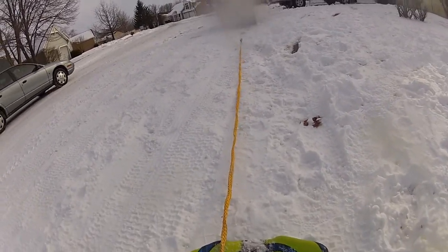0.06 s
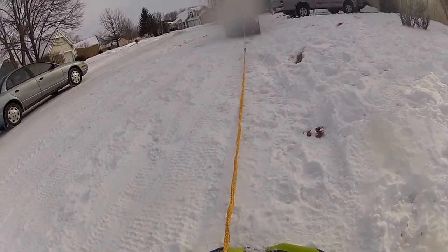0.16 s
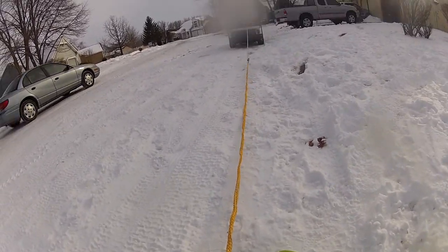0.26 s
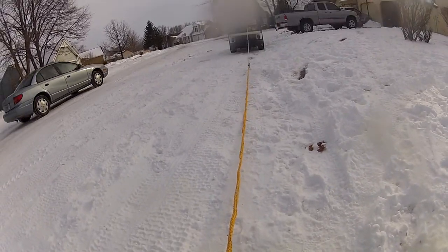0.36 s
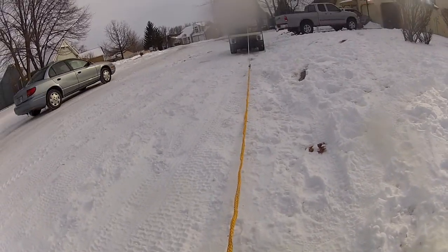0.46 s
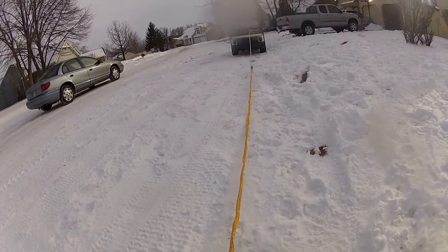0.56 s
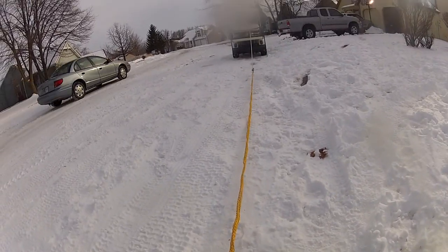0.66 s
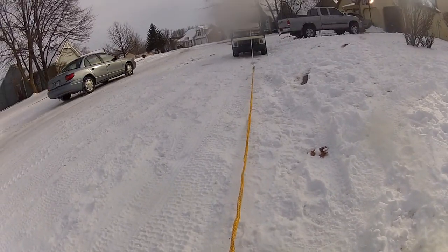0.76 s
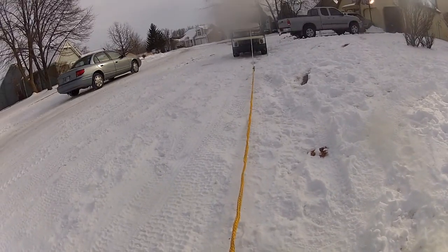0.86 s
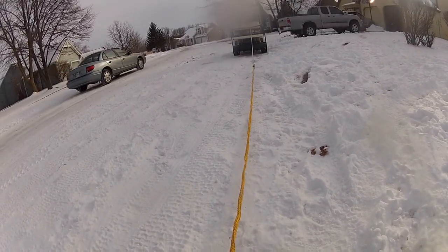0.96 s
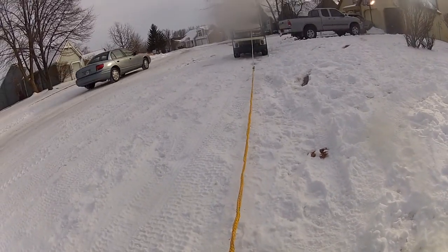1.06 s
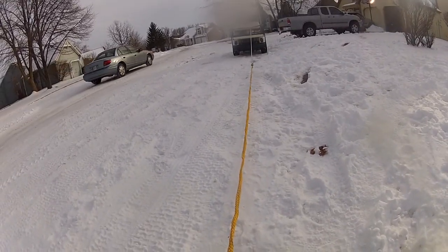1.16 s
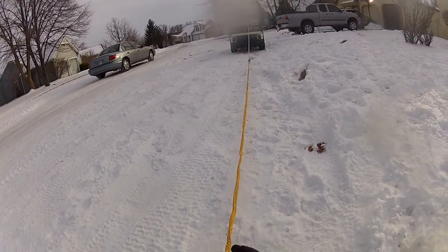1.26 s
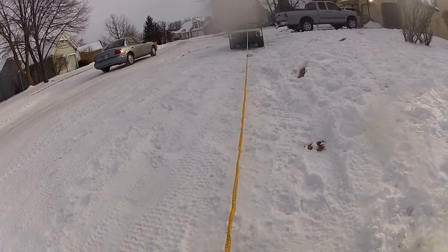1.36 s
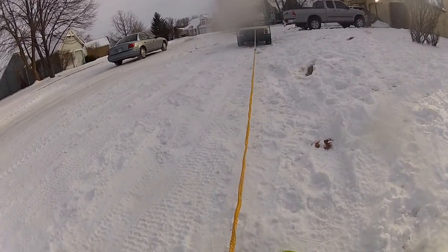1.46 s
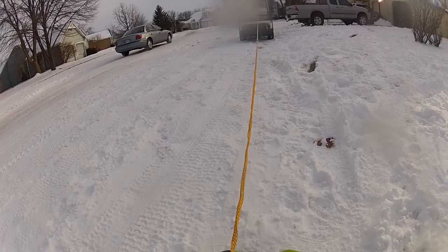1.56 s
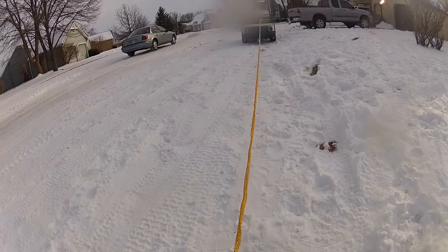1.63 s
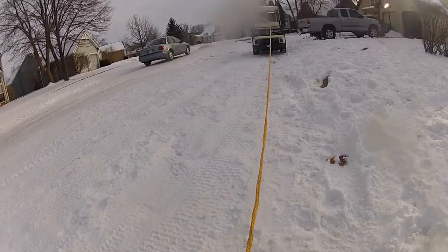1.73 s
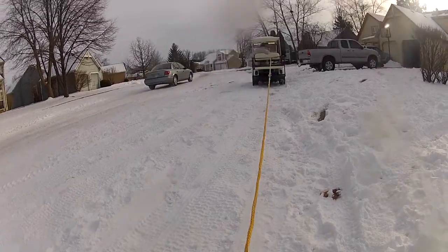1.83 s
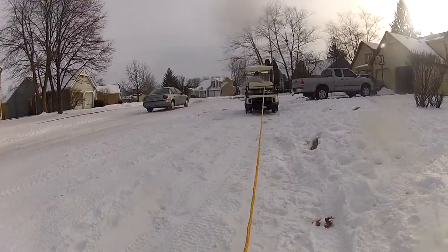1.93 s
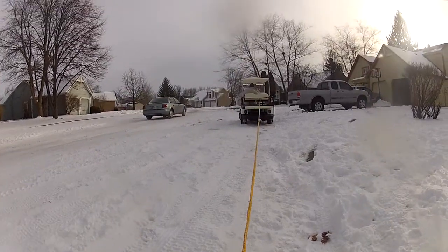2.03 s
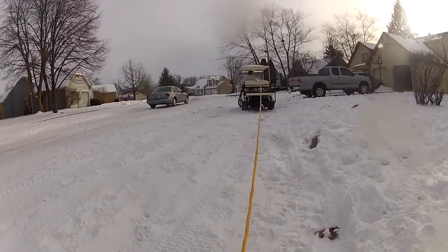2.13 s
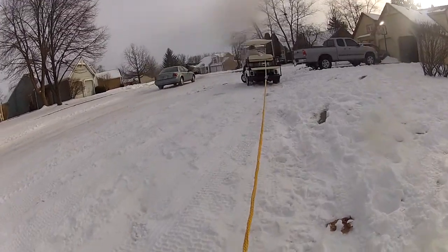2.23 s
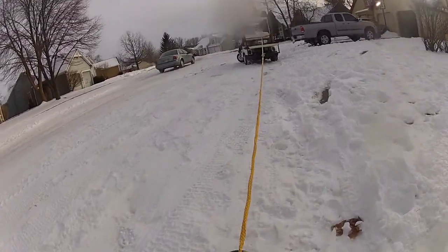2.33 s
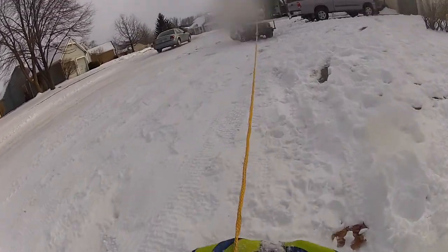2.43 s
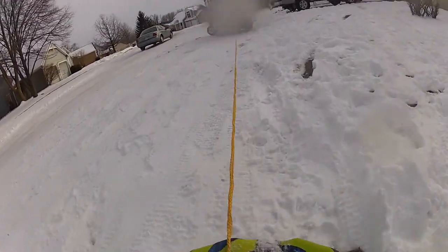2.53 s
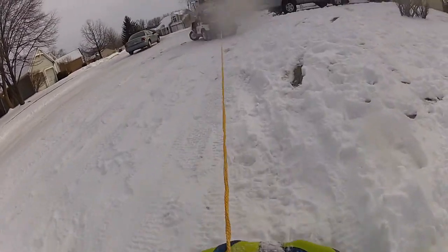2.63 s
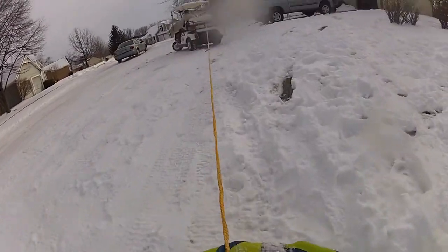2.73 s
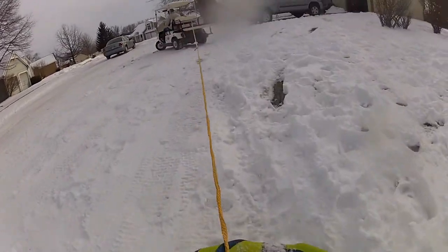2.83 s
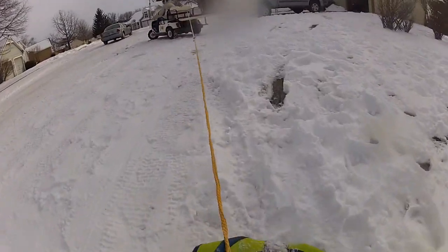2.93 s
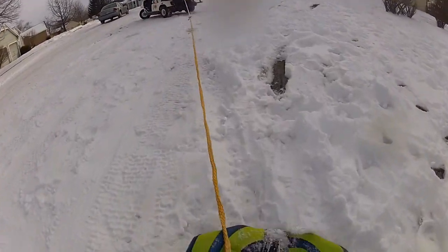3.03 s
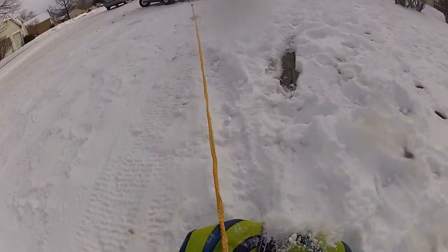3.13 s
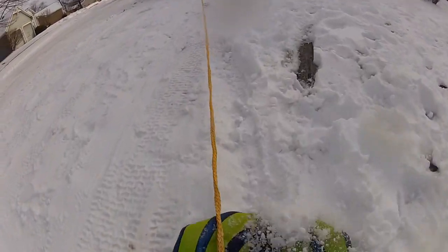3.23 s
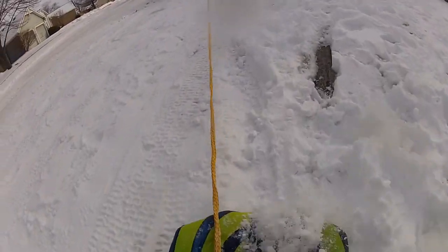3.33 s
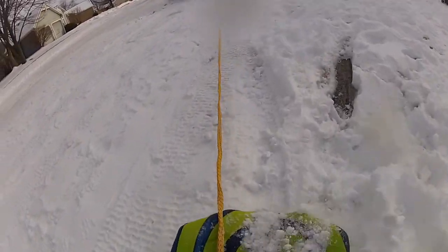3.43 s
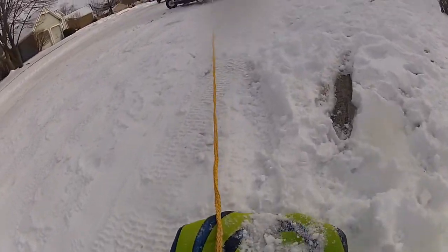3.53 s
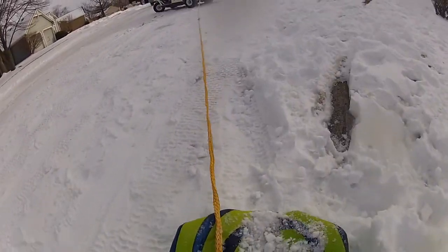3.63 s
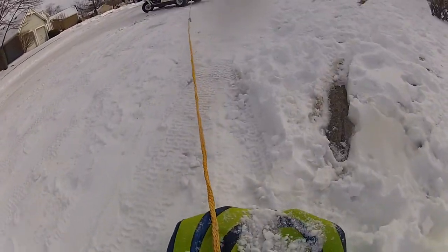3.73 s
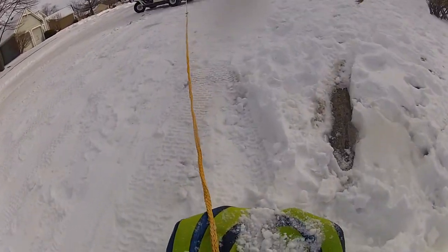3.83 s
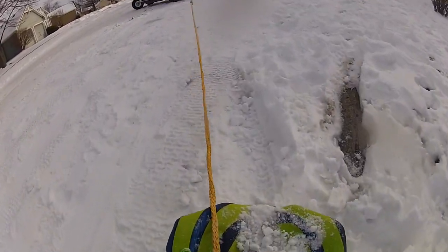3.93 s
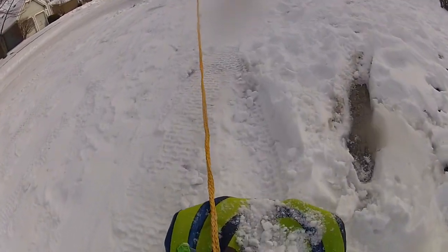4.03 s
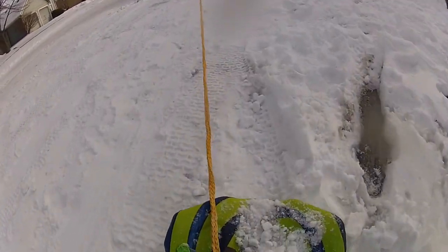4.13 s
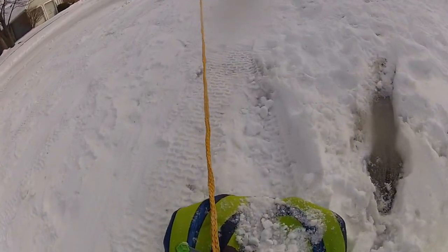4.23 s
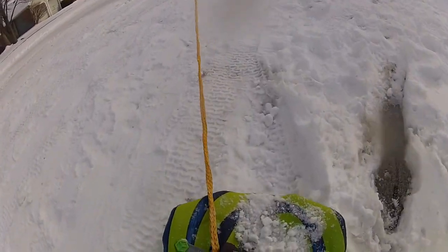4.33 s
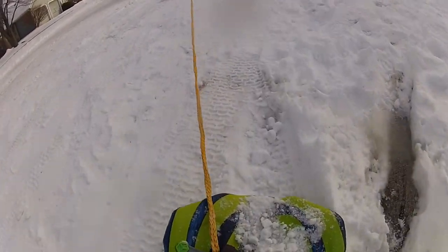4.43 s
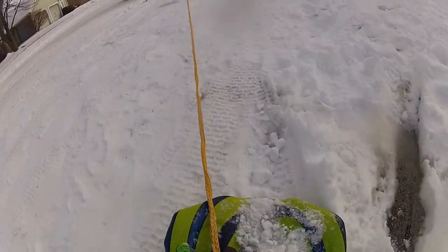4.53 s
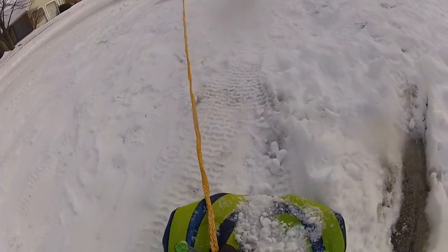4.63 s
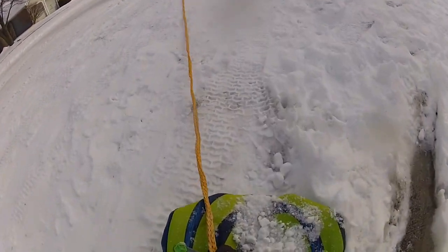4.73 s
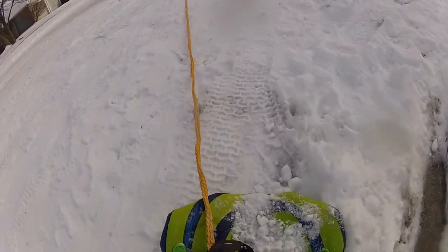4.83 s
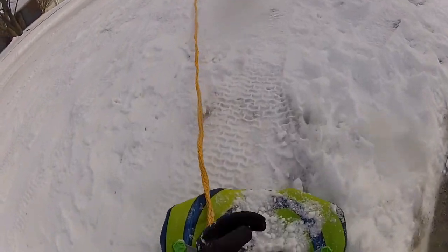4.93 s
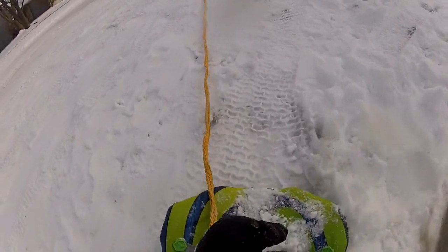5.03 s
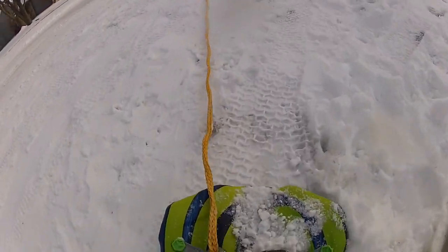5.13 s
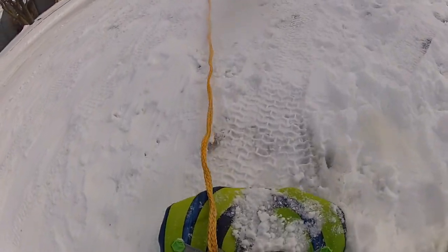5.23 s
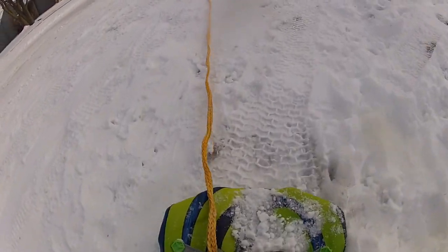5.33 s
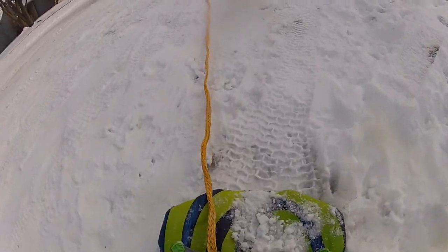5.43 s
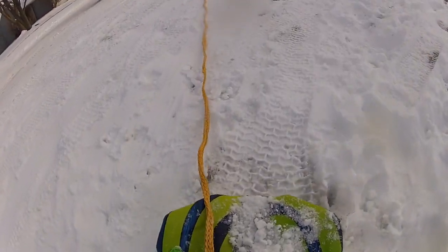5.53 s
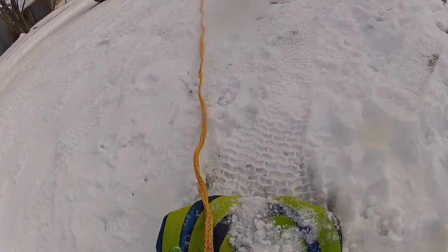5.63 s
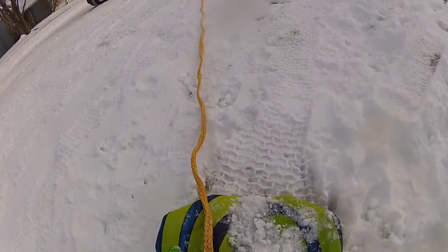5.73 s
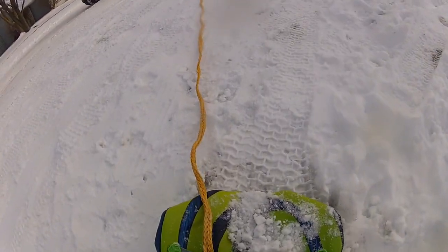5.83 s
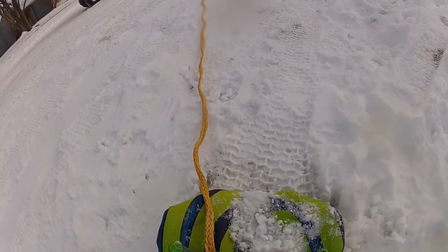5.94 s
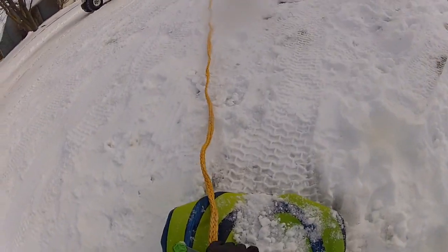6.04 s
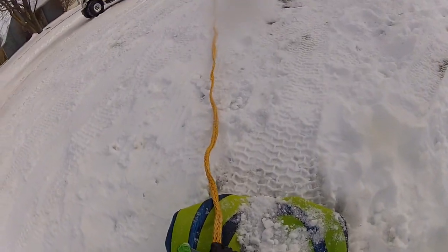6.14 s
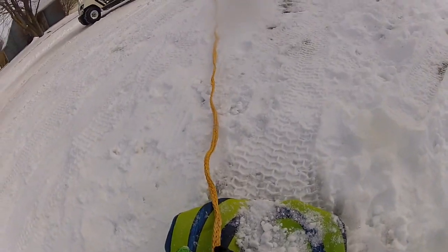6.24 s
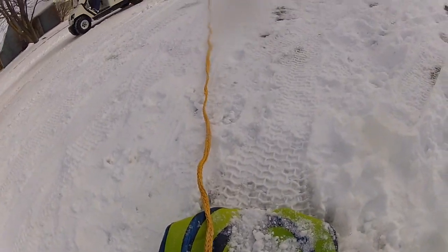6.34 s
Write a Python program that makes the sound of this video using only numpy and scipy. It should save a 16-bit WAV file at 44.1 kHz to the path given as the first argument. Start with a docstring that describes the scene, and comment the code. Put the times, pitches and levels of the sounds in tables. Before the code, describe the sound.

Plastic clicks close by over a quiet puttering engine, then a towed sled crunches, thumps and hisses roughly over packed snow before stopping.

```python
"""Snow crunches, hisses and thumps under a towed sled, plastic clicks close by and an engine putters ahead.
The hollow hull turns dense random fractures into crunch, boom and hiss; hard lumps make it swing once.
The microphone rides along in a plastic case, whose slipping joints strike ringing modes and a dull knock.
A small cart tows the sled: its exhaust puffs once per firing at the far end of the rope.
Crust ticks, snow patters briefly on the case, and the open air adds a faint steady hiss."""
import sys
import numpy as np
from scipy.fft import rfft, irfft, next_fast_len
from scipy.io import wavfile
from scipy.ndimage import map_coordinates

SR = 44100
rng = np.random.default_rng(int(sys.argv[2]) if len(sys.argv) > 2 else 0)


def inscribe(sig):
    """Save sig as 16-bit PCM at rate SR to the path in sys.argv[1].

    A 1-D sig is mono; a 2-D sig holds one channel per row.
    Samples are clipped to [-1, 1] before scaling.
    """
    pcm = np.round(np.clip(np.atleast_2d(sig).T, -1, 1) * 32767)
    wavfile.write(sys.argv[1], SR, pcm.astype(np.int16))


N = 281799

# hull on the snow, pulled away, ploughing through deep snow, gliding, stopping:
# (t/s, crunch level/dB, hiss level/dB)
HULL_SLIDE = [(0, -40.5, -56.5), (.8, -42.5, -71.5), (1.35, -43, -66), (1.62, -39.5, -57),
              (1.77, -29, -48.5), (1.83, -23.5, -40), (2.1, -23, -37.5), (2.42, -21.5, -38),
              (2.56, -23.5, -41.5), (3.02, -20.5, -46.5), (3.04, -20.5, -39.5), (3.22, -15, -34.5),
              (3.36, -18, -34.5), (3.52, -25, -40.5), (3.95, -27, -43.5), (4.3, -24.5, -42),
              (4.72, -25.5, -43.5), (5.0, -23, -37.5), (5.09, -27, -41.5), (5.36, -24.5, -39),
              (5.49, -21, -34), (5.61, -31, -45), (5.76, -30, -46), (5.82, -29, -50), (5.85, -41.5, -62),
              (6.12, -41.5, -63.5), (6.39, -40, -58.5)]
# lumps that hit the hull hard: (t/s, level/dB, f/Hz)
HARD_LUMPS = [(1.533, -21.5, 380), (1.707, -19, 398), (1.809, -10.5, 392), (1.923, -10, 366),
              (2.161, -8.5, 375), (2.279, -7.5, 327), (2.3282, 0.5, 313), (2.3647, -6.5, 320),
              (2.541, -18.5, 337), (2.627, -11, 424), (2.6665, -5.5, 365), (2.711, -5, 393),
              (2.7402, -8, 343), (2.781, 5, 300), (2.9262, -7, 360), (2.9473, -10.5, 359),
              (3.021, -16.5, 437), (3.0898, -5.5, 398), (3.1288, 3, 330), (3.194, -1.5, 270),
              (3.229, -9, 327), (3.2658, -2.5, 359), (3.2871, -6, 400), (3.41, -12, 298),
              (3.6248, -1.5, 376), (3.665, -10, 348), (3.7796, -11.5, 265), (3.8163, -7.5, 274),
              (3.869, -12.5, 283), (3.919, -10.5, 330), (4.042, -9.5, 317), (4.144, -10, 383),
              (4.181, 4, 364), (4.203, -8.5, 367), (4.2457, -8.5, 375), (4.3176, -5, 405),
              (4.334, -10, 370), (4.386, -6, 358), (4.4348, -1, 437), (4.5439, 0.5, 312),
              (4.6771, -10.5, 483), (4.71, -15, 221), (4.7689, -4.5, 337), (4.8661, 4.5, 382),
              (4.9232, -8, 404), (4.992, -9.5, 370), (5.0217, -10, 420), (5.1709, -4.5, 420),
              (5.218, -12, 402), (5.5046, -5.5, 424), (5.8162, -15.5, 295), (6.2178, -19.5, 423)]


def amp(db):
    """Decibels to gain."""
    return 10 ** (np.asarray(db) / 20)


def unit(x):
    """x at rms 1."""
    return x / np.sqrt(np.mean(x ** 2) + 1e-20)


def curves(rows):
    """One value per sample for each column after the time."""
    s, *cols = np.transpose(rows)
    return [np.interp(np.arange(N) / SR, s, c) for c in cols]


def wobble(rate):
    """A smooth random curve, rate knots a second."""
    knots = rng.standard_normal(int(N * rate / SR) + 4)
    return map_coordinates(knots, [np.arange(N) * rate / SR])


def swell(s, length):
    """A smooth bump of height 1 around time s; length is its width in s at 1/e of the height."""
    return np.exp(-(2 * (np.arange(N) / SR - s) / length) ** 2)


def colour(x, points):
    """x through a causal, minimum-phase filter with the given (f/Hz, level/dB) spectrum."""
    m = next_fast_len(len(x) + 8192)
    hz, db = np.transpose(points)
    log_hz = np.log(np.fft.rfftfreq(m, 1 / SR) + 1)
    cepstrum = irfft(np.log(amp(np.interp(log_hz, np.log(hz), db))), m)
    # folding the cepstrum forward in time makes the filter causal
    cepstrum[1:m // 2] *= 2
    cepstrum[m // 2 + 1:] = 0
    return irfft(rfft(x, m) * np.exp(rfft(cepstrum)), m)[:len(x)]


def below(x, hz):
    """Steep low-pass."""
    m = next_fast_len(N + 8192)
    return irfft(rfft(x, m) * (np.fft.rfftfreq(m, 1 / SR) < hz), m)[:N]


def add(track, s, sound):
    """Mix a sound into the track from time s."""
    part = track[max(round(s * SR), 0):][:len(sound)]
    part += sound[:len(part)]


def grains(rate, spread_db, smooth):
    """Random fractures of uneven size, rate a second, over a share of smooth rubbing noise."""
    sizes = amp(spread_db * np.clip(rng.standard_normal(N), -2, 2)) * rng.choice([-1, 1], N)
    fractures = sizes * (rng.random(N) < rate / SR)
    return unit(unit(fractures) + smooth * rng.standard_normal(N))


def sliding():
    """Crust collapses under the hull, which booms; crystals scrape along it and hiss."""
    # kind of snow: (t/s, icy grit level re the hiss/dB, firmness as upper crunch over lower/dB)
    snow = [(1.5, -14, -3), (1.9, -4.5, 0.5), (2.25, -6.5, 1), (2.6, -15, 0), (3.02, -11.5, -2),
            (3.05, -6, -1.5), (3.35, -3.5, -2.5), (3.65, -13.5, -2.5), (4.05, -9, 3), (4.35, -38.5, 0.5),
            (4.65, -11, -2), (5.03, -7, -1), (5.3, -12, 4), (5.7, -11.5, 0.5)]
    # spectrum of collapsing crust in the hull: (f/Hz, level/dB)
    crunch_spectrum = [(25, -26), (50, -25.5), (80, -11), (130, -5.5), (200, 0.5), (310, 3), (400, 0),
                       (520, -0.5), (650, -3), (800, -12.5), (1050, -24.5), (1600, -31), (3000, -74)]
    # spectrum of scraping crystals: (f/Hz, level/dB)
    hiss_spectrum = [(500, -11.5), (1000, 1.5), (1500, -2.5), (2100, 2), (2800, 3.5), (3650, 0),
                     (4300, -16.5), (5100, -9), (6000, -33.5), (7000, -20.5), (10000, -38)]
    # spectrum of fine powder: (f/Hz, level/dB)
    powder_spectrum = [(4000, -6), (6100, -17), (6900, 1.5), (7700, -12), (8500, 4.5), (9400, 3),
                       (10600, -12), (13300, -12), (14200, -9), (15100, 3), (15600, -27)]
    # spectrum of icy grit: (f/Hz, level/dB)
    grit_spectrum = [(2500, -10.5), (3800, 5.5), (4900, 0.5), (5500, -3), (6100, -17), (7200, -1.5),
                     (8000, -0.5), (11000, -18)]
    split_hz = 450  # between boom and rasp
    powder_re_hiss_db, powder_growth = -9.5, 1.3  # growth: dB per dB of hiss

    crunch_db, hiss_db = curves(HULL_SLIDE)
    ice_db, firm_db = curves(snow)
    contact_db = contact()
    crunch_db, hiss_db = crunch_db + 0.81 * contact_db, hiss_db + contact_db
    pressure = wobble(28)  # the load shifts over the uneven track

    crunch = unit(colour(grains(rate=300, spread_db=2.5, smooth=0.81), crunch_spectrum))
    boom = below(crunch, split_hz)
    rasp = crunch - boom
    crunch = boom * amp(-firm_db / 2) + rasp * amp(firm_db / 2)  # soft snow booms, firm snow rasps

    scrape = 0.84 * wobble(170) + 1.4 * wobble(45)  # dB: crystals catch in small clumps
    hiss = unit(colour(grains(rate=1100, spread_db=1.5, smooth=1.0), hiss_spectrum))
    powder = unit(colour(grains(rate=5000, spread_db=8, smooth=1.5), powder_spectrum))
    grit = unit(colour(grains(rate=1500, spread_db=5.5, smooth=0.95), grit_spectrum))
    # above a floor, powder grows a little faster than the hiss
    extra_db = np.maximum((powder_growth - 1) * (hiss_db + 33.5), -1)
    powder_db = hiss_db + powder_re_hiss_db + extra_db
    return (crunch * amp(crunch_db - 2.5 + 2.16 * pressure)
            + hiss * amp(hiss_db - 1.84 + .5 * pressure + scrape + 0.62 * wobble(14))
            + powder * amp(powder_db + 0.49 * pressure + scrape)
            + grit * amp(hiss_db + ice_db + scrape))


def contact():
    """Change of pressure in dB: ridges press on the hull, a hard blow unloads it for a moment."""
    # ridges of snow that the hull scrapes over: (t/s, length/s, swell/dB)
    ridges = [(2.672, 0.039, 3.5), (2.925, 0.043, 6.5), (3.742, 0.067, 2.5), (4.837, 0.04, 4.5),
              (5.227, 0.058, 4)]
    # the hardest blows lift the hull off the snow, the harder the longer
    hop_above_db, hop_s, hop_s_per_db, hop_dip_db = 3.5, 0.011, 0.09, 7

    press_db = sum(db * swell(s, length) for s, length, db in ridges)
    flights = [(s, hop_s + hop_s_per_db * (db - hop_above_db))
               for s, db, hz in HARD_LUMPS if db > hop_above_db]
    return press_db - hop_dip_db * sum(swell(s + 0.36 * length, length) for s, length in flights)


def lumps():
    """A lump pushes the hull up and lets it go: one heavily damped swing."""
    track, t = np.zeros(N), np.arange(-SR // 50, SR // 50) / SR
    for s, db, hz in [*HARD_LUMPS, *small_lumps()]:
        u = (np.pi * hz * t) ** 2
        swing = (2 * u - 1) * np.exp(-u)
        rebound = -0.14 * np.exp(-((t - 1.09 / hz) * hz * 5) ** 2)  # the hull drops back
        # hard blows also shove the whole sled and crack the crust
        heave = 0.11 * np.exp(-((t - .0015) / 0.0015) ** 2)
        snap = 0.0082 * rng.standard_normal(len(t)) * np.exp(-(t / 0.0018) ** 2)
        add(track, s + t[0], amp(db - 1.0) * (swing + rebound + amp(db) * (heave + snap)))
    return colour(track, [(20, -13.5), (45, 0)])


def small_lumps():
    """Rows (t/s, level/dB, f/Hz) of small lumps met at random while the crunch is at a middling level."""
    per_s, re_crunch_db, centre_hz = 9, 7, 330
    crunch_db = curves(HULL_SLIDE)[0]
    rows = []
    for k, (when, size, pitch) in enumerate(rng.random((int(per_s * N / SR), 3))):
        s = (k + when) / per_s
        level_db = crunch_db[int(s * SR)]
        if -33 < level_db < -20:  # deep snow cushions them
            rows.append((s, level_db + re_crunch_db + 5 * (size - .5), centre_hz * 2 ** (pitch - .5)))
    return rows


def snaps():
    """Bits of icy crust break under the hull: ticks of a few cycles, louder the harder it scrapes."""
    # sharp snaps of the crust: (t/s, level/dB, f/Hz)
    sharp = [(2.365, -25, 1320), (2.413, -23, 2500), (3.174, -22, 2400), (3.265, -25, 1150),
             (4.574, -25, 1750)]
    per_s, re_hiss_db, centre_hz = 30, 5, 2160  # small ones at random

    track, t = np.zeros(N), np.arange(SR // 100) / SR
    hiss_db = curves(HULL_SLIDE)[1] + contact()
    small = []
    for when, size, pitch in rng.random((int(per_s * N / SR), 3)):
        level_db = hiss_db[int(when * N)] + re_hiss_db + 7 * size ** 2
        small.append((when * N / SR, level_db, centre_hz * 2 ** (1.6 * (pitch - .5))))
    for s, db, hz in [*sharp, *small]:
        age = hz * t / 0.69  # in rise times
        add(track, s - .001, amp(db) * age * np.exp(1 - age) * np.sin(2 * np.pi * hz * t))
    return track


def case_clicks():
    """Plastic slips on plastic for a few milliseconds: a dense crack, the case rings and its mount knocks."""
    # slips: (t/s, level/dB, knock level/dB, knock f/Hz, f favoured by the point of contact/Hz,
    # tilt/dB per octave)
    slips = [(0.0599, -24, -12, 520, 1230, -5), (.068, -19.5, 3, 515, 1490, -3),
             (0.1282, -9.5, 5.5, 430, 3900, -0.5), (.152, -22.5, -1, 450, 2700, -8),
             (0.1862, -15.5, 1.5, 510, 2080, 0), (0.226, -18, 0, 452, 2420, -1),
             (0.264, -11.5, 5, 438, 2600, -2), (0.2872, -23.5, 3, 480, 2100, -3.5),
             (0.309, -26, -1, 520, 3000, -2), (0.3197, -18.5, 0, 540, 1270, 0),
             (0.3322, -21.5, -1.5, 546, 2100, 0.5), (0.3564, -23.5, -14, 560, 2000, 0.5),
             (.367, -31, -8, 565, 3800, -2.5), (0.478, -14.5, -3, 666, 1900, -1),
             (.553, -37.5, -8, 600, 3930, 5), (.605, -10.5, 3.5, 615, 1080, 0.8),
             (.6423, -34, 0, 563, 1240, -4), (0.664, -30.5, -7, 560, 1250, -3),
             (.974, -17.5, -18, 620, 1990, -2), (0.9824, -11, -16, 665, 1900, 2),
             (1.1232, -36, -2.5, 560, 1200, -10.5), (1.361, -41, -6, 560, 1400, -1),
             (1.434, -41, 5, 480, 3020, -1), (5.4257, -14, 6, 566, 1250, -1),
             (5.4378, -9.5, 0, 517, 1240, 2), (5.499, -22, -10, 555, 1250, 0.5),
             (5.534, -23, -8, 560, 2000, 1), (5.595, -4, 4, 597, 3700, 1.2)]
    # modes of the case, before each slip's scatter: (f/Hz, level/dB, 60 dB decay/s)
    case_modes = [(612, -1, 0.019), (744, -3.5, 0.016), (1130, 3, 0.015), (1240, -4, 0.056),
                  (1924, -2, 0.031), (2092, -15.5, 0.063), (2280, -7, 0.022), (2620, -20, 0.0087),
                  (2812, -10, 0.033), (3610, -13, 0.011), (3792, 4, 0.018), (4816, -5, 0.013),
                  (7070, -10, 0.011), (8150, -1, 0.019)]
    # spectrum of the crack: (f/Hz, level/dB)
    crack_spectrum = [(200, 2.5), (450, 1), (800, 5.5), (1200, -9.5), (2200, 1.5), (3600, -2.5),
                      (5100, -10), (6000, -19.5), (7100, -9.5), (10500, -11.5), (12000, -28.5),
                      (14200, -14.5), (15600, -26.5)]
    favour_db, favour_octaves = 4, 0.18  # lift of the modes near the favoured frequency, and its width
    chatter_s, chatter_db = .004, -12  # a second, weaker slip: mean delay and level

    track, t = np.zeros(N), np.arange(SR // 8) / SR
    hz, level, t60 = np.transpose(case_modes)[:, :, None]
    for s, db, knock_db, knock_hz, favoured_hz, tilt_db in slips:
        # random level, pitch, phase and decay of every mode
        strike = rng.standard_normal((4, len(case_modes), 1))
        near = np.exp(-(np.log2(hz / favoured_hz) / favour_octaves) ** 2)
        mode_db = level + tilt_db * np.log2(hz / 1900) + favour_db * near + 2.1 * strike[0]
        sizes = amp(mode_db - 60 * t / (t60 * 1.3 ** strike[3]))
        modes = sizes * np.sin(2 * np.pi * (hz * (1 + 0.021 * strike[1]) * t + strike[2]))

        tilted = [(f, d + tilt_db * np.log2(f / 1900) / 2) for f, d in crack_spectrum]
        rasp = unit(colour(rng.standard_normal(len(t)), tilted))
        crack = rasp * (np.exp(-(t / 0.0048) ** 2) + amp(-16 - 60 * t / 0.087))

        knock = amp(knock_db - 60 * t / 0.047) * np.sin(2 * np.pi * knock_hz * t)
        # the whole case bumps, an octave lower
        thud = 0.82 * amp(knock_db - 60 * t / 0.021) * np.sin(np.pi * knock_hz * t)

        onset = 1 - np.exp(-(t / 0.0011) ** 2)
        click = amp(db - 8.5) * (modes.sum(0) + thud + 0.77 * crack + 0.81 * knock) * onset
        add(track, s, click)
        # the joint gives a little just before it slips, and catches once more after it
        add(track, s - .001 - 0.0019 * rng.random(), 0.11 * click)
        add(track, s + chatter_s * (.5 + rng.random()), amp(chatter_db) * click)
    return colour(track, [(50, -18), (160, -0.5)])


def spray():
    """Snow thrown up by the nose patters on the case and sings in its upper resonances."""
    # gushes of snow: (t/s, length/s, level/dB)
    gushes = [(3.3495, 0.0082, -23), (4.073, 0.14, -45.5)]
    # spectrum of snow on the case: (f/Hz, level/dB)
    patter_spectrum = [(1500, -29), (2500, -10), (3100, 3), (3550, 11), (4000, 1), (4500, -36), (6000, -25),
                       (7600, -22), (8400, 5), (9600, -23), (15000, -31)]
    gush = sum(amp(db) * swell(s, length) for s, length, db in gushes)
    return gush * unit(colour(grains(rate=1500, spread_db=20, smooth=.6), patter_spectrum))


def cart():
    """One exhaust puff per firing, dulled by distance, with a steady hum, a low road rumble and a thin whirr."""
    # the engine revs to take up the rope, then draws away: (t/s, mean firing f/Hz, level/dB)
    engine = [(0, 50, -40.5), (1.6, 52, -38.5), (2.1, 47, -41.5), (5.5, 48.4, -50), (5.9, 47, -47.5),
              (6.39, 43, -46)]
    # lines of the hum: (multiple of the firing rate, mean level re the engine/dB)
    hum_lines = [(1, -5), (2, -8.5), (4, -13)]
    # spectrum of exhaust and road rumble: (f/Hz, level/dB)
    exhaust_spectrum = [(25, -23), (38, 1), (95, 0), (150, -1.5), (200, -1.5), (260, -7), (330, -24.5),
                        (600, -24), (1500, -55.5)]
    # spectrum of the whirr: (f/Hz, level/dB)
    whirr_spectrum = [(600, -28.5), (1050, -4.5), (1330, 10), (1600, -6), (2300, -20), (3000, -16),
                      (4500, -8), (7000, -45.5)]

    firing_hz, engine_db = curves(engine)
    turns = np.cumsum(firing_hz * (1 + 0.008 * wobble(18))) / SR  # firings so far
    puffs = np.diff(np.floor(turns), prepend=0) * amp(2.5 * wobble(35))
    rumble = 2.8 * rng.standard_normal(N)
    exhaust = amp(1.1) * unit(colour(unit(puffs - puffs.mean()) + rumble, exhaust_spectrum))
    hum = np.sqrt(2) * sum(amp(db + 2.6 * wobble(5.3)) * np.sin(2 * np.pi * k * turns)
                           for k, db in hum_lines)
    whirr = amp(-26.5) * unit(colour(rng.standard_normal(N), whirr_spectrum))
    return amp(engine_db) * (hum + whirr + exhaust)


def air():
    """Faint steady hiss of the open street: coloured noise."""
    # spectrum of the outdoor hiss: (f/Hz, level/dB)
    air_spectrum = [(500, 1), (1100, 1.5), (1550, -4), (2000, 9), (2400, -11), (2950, 5), (3350, -13),
                    (4100, -2), (4800, -3.5), (6000, -20), (8500, -6.5), (15000, -23)]
    return amp(-66) * unit(colour(rng.standard_normal(N), air_spectrum))


def scene():
    """Everything reaches one microphone, in the open air."""
    return (sliding() + lumps() + snaps() + case_clicks() + spray() + cart() + air())[None]


def record(dry):
    """The microphone chain clips high peaks and leaks a faint mirror image of the lows into the treble."""
    top, mirror_hz, cutoff_hz = .7, 12000, 15450  # top: clipping level, full scale 1
    sound = np.clip(dry[0], -top, top)
    leak_spectrum = [(40, -22), (150, -17.0), (350, 0.5), (900, 6.0), (1600, 12.5), (3000, 11)]
    lows = colour(below(sound, 3500), leak_spectrum)
    # the product with a tone puts the lows on both sides of it
    mirror = amp(-22.5) * lows * np.cos(2 * np.pi * mirror_hz * np.arange(N) / SR)
    return below(sound + mirror, cutoff_hz)[None]


dry = scene()
out = record(dry)
inscribe(out)
```